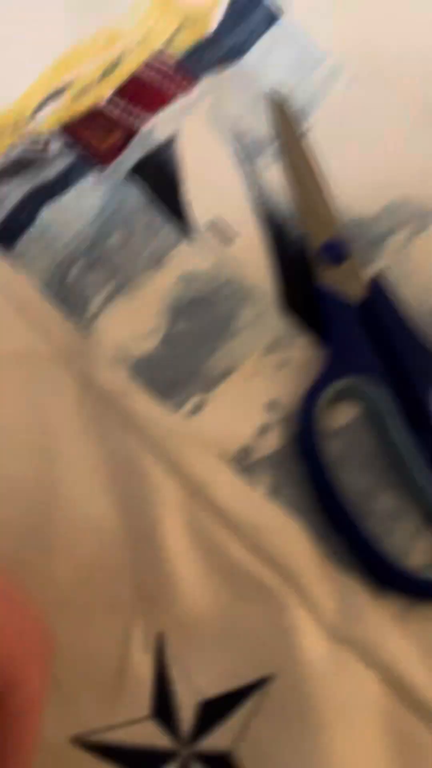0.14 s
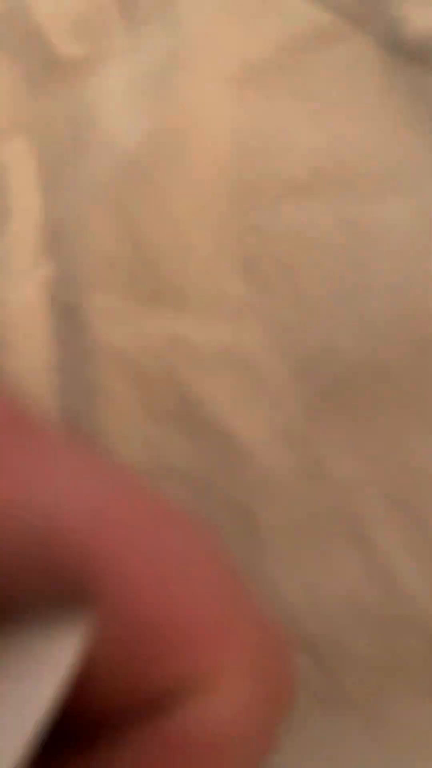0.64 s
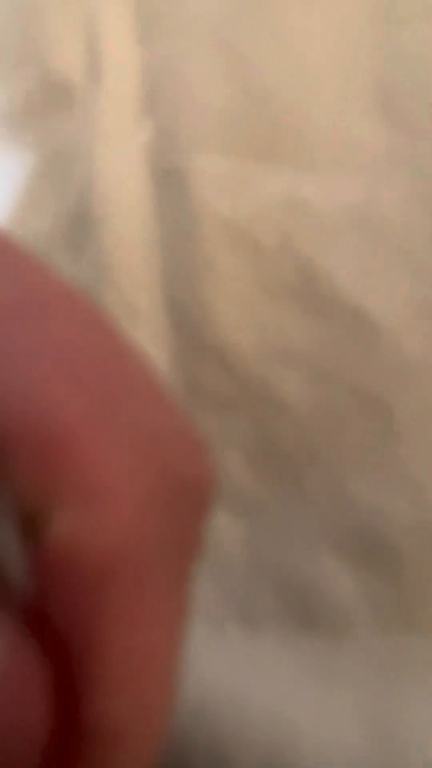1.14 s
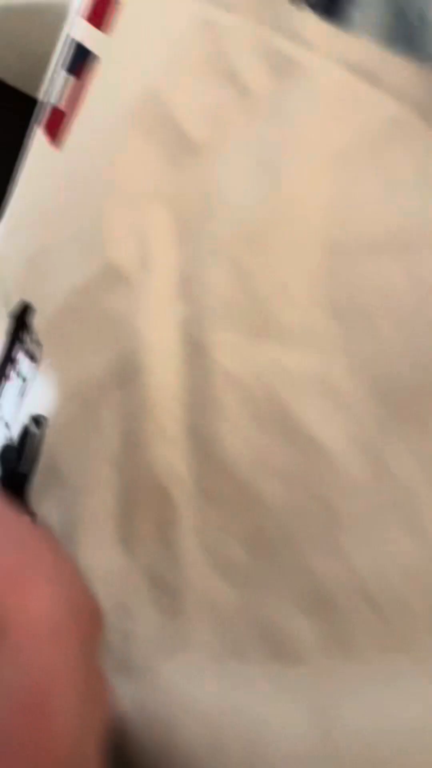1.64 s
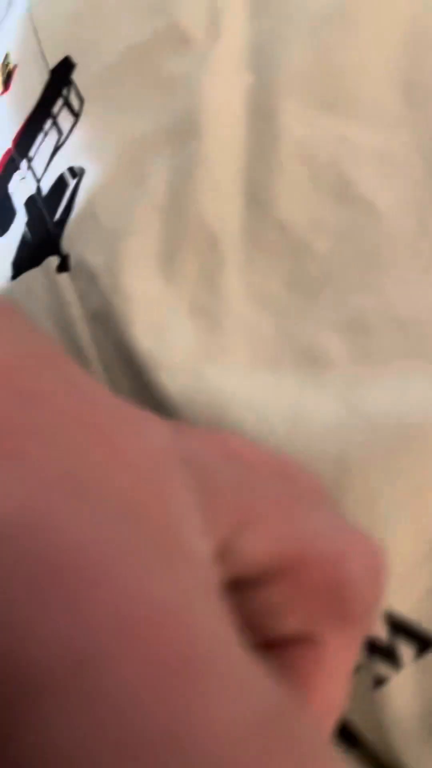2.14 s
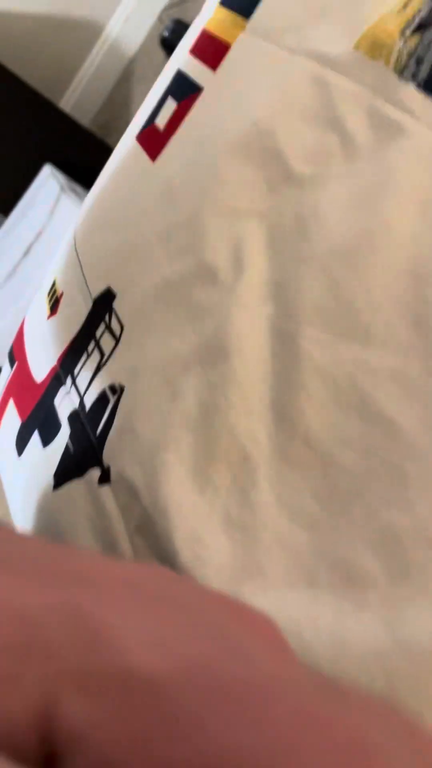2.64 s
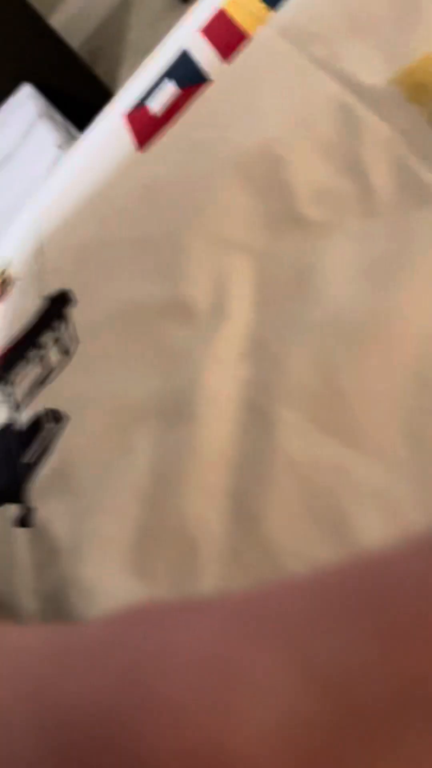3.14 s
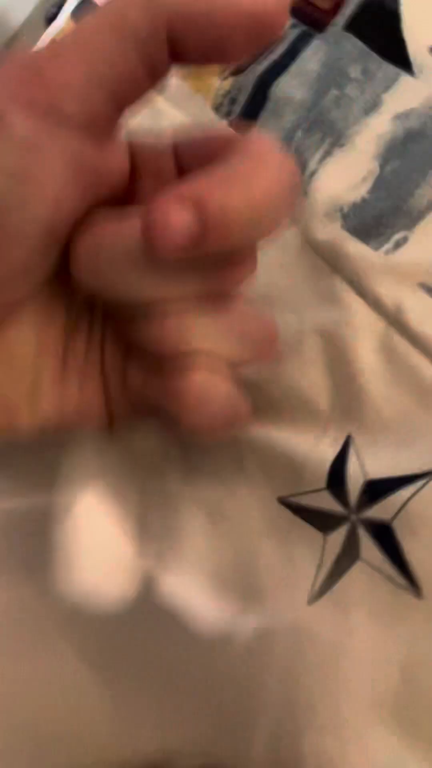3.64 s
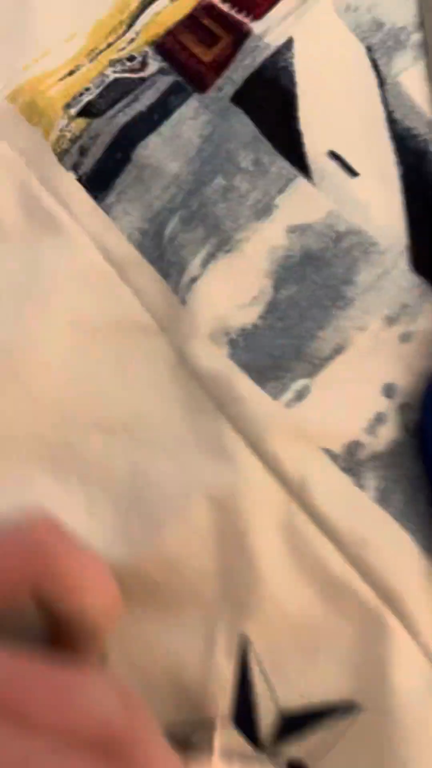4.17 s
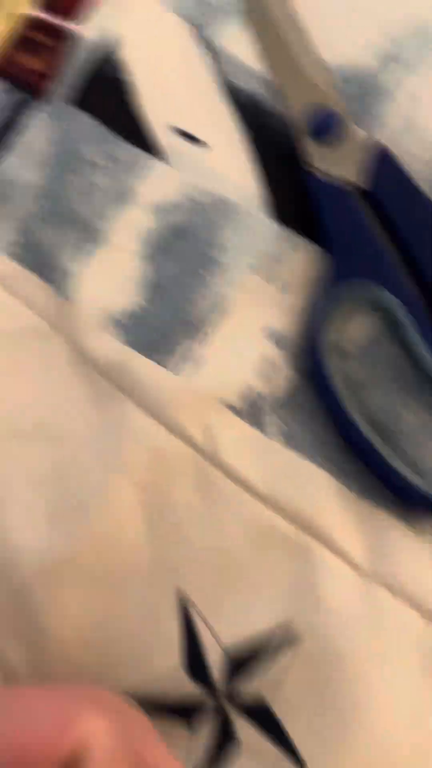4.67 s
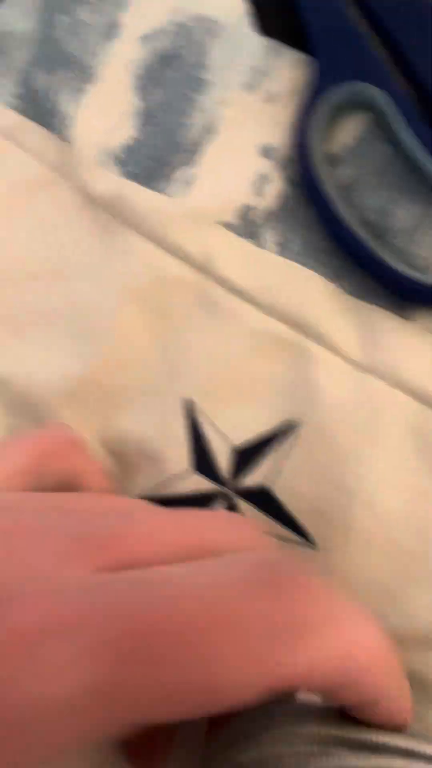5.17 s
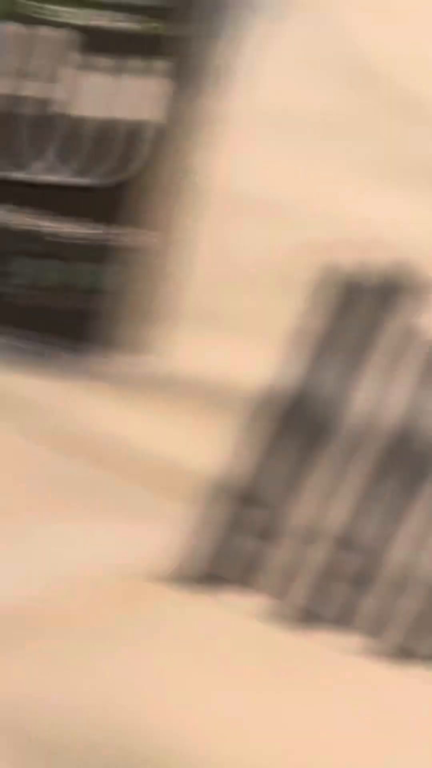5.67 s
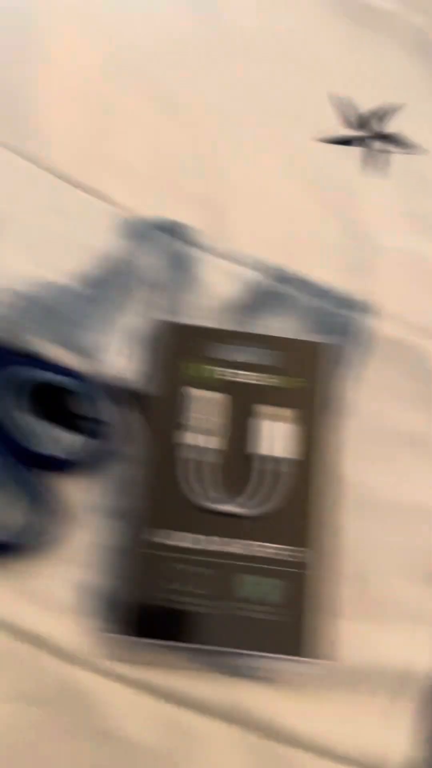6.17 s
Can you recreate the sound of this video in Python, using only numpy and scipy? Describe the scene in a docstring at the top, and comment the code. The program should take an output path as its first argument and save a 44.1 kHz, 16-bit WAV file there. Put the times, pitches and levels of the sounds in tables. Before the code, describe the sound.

Close up, hands pull open a stiff plastic and card package: bright snaps, hollow card pops, crinkling rubs and soft low bumps.

```python
"""On a bed, close to a two-port phone microphone, hands pull a plastic and card package open.
The film cracks and snaps in short bright bursts, the card buckles with short falling pops, and the box bumps.
Between these, fingers rub and crinkle the sheet: shaped noise, gliding resonances and crowds of tiny bursts.
Bending waves carry treble faster than bass, so every struck event sweeps downward."""
import sys
import numpy as np
from scipy import signal
from scipy.fft import rfft, irfft, next_fast_len
from scipy.io import wavfile
from scipy.ndimage import uniform_filter1d

SR = 44100
rng = np.random.default_rng(int(sys.argv[2]) if len(sys.argv) > 2 else 0)


def dump(signal):
    """Clip the signal to [-1, 1] and save it as 16-bit WAV at the path in sys.argv[1]."""
    limited = np.clip(np.atleast_2d(signal).T, -1, 1)
    pcm = np.round(limited * 32767).astype(np.int16)
    wavfile.write(sys.argv[1], SR, pcm)


def gain_from_db(level_db):
    """Convert decibel levels to linear amplitude factors (20 dB per decade)."""
    decades = np.asarray(level_db, float) / 20
    return 10 ** decades


N = 277830  # 6.3 s

# Film cracks. Each row: time in seconds, peak in dB, pitch of the bright patch in Hz,
# lift of the top end over the rest in dB, broad colour beside the bright patch in dB.
CRACKS = [(0.205, -1, 3310, 1.5, 5.5), (0.5484, -39, 2100, 10, -11.5), (0.555, -43, 2050, 9, -9),
          (0.5873, -15.5, 3830, -10, -5), (0.5925, -6, 3500, -6, -9), (0.728, -25, 2123, 2, -4.5),
          (0.8784, -18, 3640, 2, 3), (1.064, -41, 2180, -3, -2), (1.308, -33.5, 1300, -4, -8.5),
          (1.386, -39, 2200, 0, -16), (1.423, -25, 1880, -9, -9), (1.4379, -25.5, 2210, 5, -1),
          (1.462, -39, 2150, 0, -10.5), (1.481, -41, 1000, -3, -3), (1.947, -36.5, 1920, 24.5, -14),
          (2.077, -37, 2370, 0, -17), (2.1504, -10, 2650, -1, -12), (2.156, -16, 2300, 0.5, -1.5),
          (2.1843, -14, 2640, -5, -2), (2.2386, -30.5, 3700, 16.5, -2), (2.2555, -12, 4530, -2, 5.5),
          (2.2611, -3, 2060, 3.5, -1), (2.458, -23.5, 2200, 4, -12.5), (2.64, -36, 2570, -6, -12),
          (2.803, -44.5, 2030, -2, -5), (2.994, -41.5, 4750, 3, -8), (3.023, -21.5, 5320, 5, -9.5),
          (3.1306, -41, 5490, 10, -17), (3.1407, -30.5, 1600, 1.5, 3), (3.1593, -15.5, 4960, 10.5, -20),
          (3.1991, -11, 5470, 16.5, -24), (3.207, -20.5, 5400, 10, -6.5), (3.2172, -6.5, 5400, 11, -12.5),
          (3.225, -8.5, 5500, 9.5, 0), (3.239, -15.5, 5800, 7.5, -1), (3.249, -14, 2800, 4, -1.5),
          (3.259, -4, 5400, 1.5, -8.5), (3.339, -21.5, 2170, 4, -2.5), (3.3543, -5, 2830, 8, -5.5),
          (3.359, -11.5, 4470, 1.5, 0), (3.3964, -8.5, 5120, 11, -8), (3.4037, -12, 3940, 6.5, -4),
          (3.4193, -16.5, 5720, 9.5, -5), (3.461, -30, 5400, 2.5, -9.5), (3.4989, -35.5, 2270, 2, -7),
          (3.5246, -9, 3740, 16, -14), (3.5459, -8.5, 1500, 7.5, 5), (3.5668, -24.5, 1776, -2.5, -2),
          (3.598, -26, 1500, 1.5, -1.5), (3.616, -4, 1770, 0.5, 1.5), (3.6273, -6.5, 1840, -4, -1.5),
          (3.646, -23.5, 1740, -14, -15.5), (3.6986, -25, 2070, -4.5, -7.5), (3.757, -50, 1500, -1.5, -16),
          (3.8165, -33, 2220, 6.5, -12.5), (3.9443, -29.5, 1510, -3, 6), (3.9649, -18, 1540, 4, 4),
          (3.986, -26, 1510, -10, -11.5), (4.0522, -27, 2270, -1, -11), (4.4912, -37, 3670, -2, -17),
          (4.556, -28.5, 2510, -13, -9), (4.8263, -20, 2650, 2.5, -4), (4.86, -28.5, 2226, 4.5, -9),
          (4.912, -33, 1600, 2, -7), (5.068, -43.5, 1560, -12, -8), (5.4514, -28, 1600, 0, -20),
          (5.4605, -21, 2170, 6, -10), (5.6366, -43, 1490, 4, -19), (5.823, -36, 2230, 12, -16.5),
          (5.872, -49.5, 1540, 4, -8.5), (5.9456, -42, 2480, 8.5, 10.5), (6.027, -29, 1490, 10, 0)]
# Single clean snaps of a crease. Each row: the same columns as the film cracks.
SNAPS = [(0.6386, -30.5, 1200, -18, -5.5), (1.1805, -34, 1300, 4.5, -5), (2.206, -28.5, 4500, -0.5, -1),
         (2.32, -29.5, 2500, 1, -0.5), (2.3732, -16.5, 2370, -10, -7), (2.385, -27, 1800, -4.5, -6),
         (2.4147, -10, 5000, -7.5, -4.5), (2.43, -36, 2500, -2, -5.5), (2.8233, -21, 2870, -5.5, -4),
         (2.8436, -20, 1890, 1.5, -9), (3.0413, -7, 2100, 7.5, 2), (4.1323, -10, 2160, -6.5, 2),
         (4.135, -16, 1000, -10.5, -2.5), (4.6265, -24, 1210, -10, -12), (4.801, -26.5, 1650, -21, -12),
         (5.4926, -6, 4500, -1, 4), (5.495, -14.5, 1950, 3.5, 9)]
# Card buckles. Each row: time in seconds, peak in dB, pitch in Hz.
POPS = [(0.009, -33, 530), (0.204, -13.5, 530), (0.444, -29, 347), (0.546, -17, 544), (0.586, -22, 520),
        (0.592, -4, 742), (0.604, -23, 800), (0.613, -22, 700), (0.638, -27, 800), (0.647, -31.5, 300),
        (0.728, -32, 708), (0.879, -24.5, 1254), (0.883, -32, 560), (1.151, -34, 603), (1.16, -29, 711),
        (1.179, -30.5, 503), (1.187, -33.5, 210), (1.284, -36.5, 870), (1.303, -36, 426), (1.341, -36, 450),
        (1.374, -31, 390), (1.382, -31.5, 291), (1.427, -28.5, 217), (1.534, -32.5, 302),
        (1.609, -31.5, 307), (1.722, -31.5, 510), (1.746, -37.5, 330), (1.757, -30.5, 504),
        (1.834, -33.5, 454), (1.9, -35, 438), (1.978, -41, 474), (2.054, -34.5, 1020), (2.151, -13, 555),
        (2.157, -23.5, 385), (2.184, -24, 480), (2.262, -15, 476), (2.264, -17.5, 1000), (2.376, -33, 236),
        (2.414, -21, 634), (2.456, -33, 297), (2.587, -34, 252), (2.641, -35, 580), (2.737, -38, 1100),
        (2.766, -39.5, 800), (2.825, -27, 810), (2.867, -27.5, 796), (2.89, -18, 340), (2.962, -37.5, 1100),
        (2.995, -26.5, 960), (3.006, -32, 800), (3.042, -14.5, 705), (3.05, -22, 650), (3.106, -33, 700),
        (3.158, -25, 870), (3.259, -8.5, 498), (3.333, -22.5, 670), (3.352, -10, 1110), (3.359, -14, 574),
        (3.395, -18.5, 972), (3.543, -16, 890), (3.545, -29, 303), (3.574, -22.5, 670),
        (3.616, -11.5, 1175), (3.63, -11, 399), (3.646, -10.5, 292), (3.697, -27, 1220), (3.702, -21, 298),
        (3.709, -19.5, 230.5), (3.806, -39.5, 450), (3.947, -34, 255), (4.043, -25, 1370),
        (4.133, -16.5, 396), (4.274, -23.5, 500), (4.312, -27.5, 1100), (4.349, -24.5, 744),
        (4.465, -36, 880), (4.587, -21, 600), (4.625, -22.5, 795), (4.801, -23, 472), (4.826, -34.5, 666),
        (4.858, -33, 298), (4.88, -31, 990), (4.91, -38, 700), (5.03, -41, 710), (5.067, -25.5, 1140),
        (5.147, -40, 450), (5.438, -40.5, 620), (5.45, -32, 596), (5.494, -22.5, 573), (5.5, -23.5, 326),
        (5.822, -35, 1040), (6, -51, 1060), (6.025, -37, 1090)]
# Box bumps. Each row: time in seconds, peak in dB, pitch in Hz.
BUMPS = [(0.197, -44, 186), (0.282, -34, 126.3), (0.389, -35.5, 191), (0.597, -31.5, 161.2),
         (0.647, -37.5, 175.7), (1.17, -40, 175), (1.416, -35, 170.5), (2.14, -27.5, 182),
         (2.204, -30.5, 171), (2.226, -31.5, 196.4), (2.271, -39, 150.4), (2.449, -28.5, 171),
         (2.712, -38, 129.8), (2.879, -34, 175.8), (3.247, -28.5, 194.4), (3.354, -20.5, 190.7),
         (3.626, -19.5, 88.1), (3.642, -27, 151), (3.668, -29.5, 70), (3.711, -22, 140.6),
         (3.722, -17, 62.4), (3.748, -25.5, 75.8), (3.805, -32, 57), (3.835, -38.5, 201), (3.96, -29, 71.2),
         (4.049, -36, 144.6), (4.135, -24.5, 119.2), (4.371, -35, 86), (4.599, -30, 160),
         (4.806, -32.5, 61.4), (5.059, -39.5, 141.8), (5.181, -41, 85.9), (5.46, -30.5, 58.6),
         (5.573, -20.5, 84.9), (5.592, -25.5, 99), (5.585, -26, 50.7), (5.624, -29.5, 70.4),
         (6.018, -42.5, 95)]
# Colour of rubbed film. Each row: frequency in Hz, relative level in dB per Hz.
FILM = [(600, -8), (1300, -1), (2300, 1), (3000, -2.5), (3800, -3), (4600, -5), (5400, -4.5), (7500, -5),
        (10200, -13.5), (13000, -20), (15500, -15), (16100, -27.5), (16900, -58.5), (18000, -100)]
# Colour of rustling card. Each row: frequency in Hz, relative level in dB per Hz.
CARD = [(100, -13.5), (250, 1.5), (500, 0), (800, 0), (1300, -5), (2500, -45), (5000, -69)]
# Colour of the low rumble. Each row: frequency in Hz, relative level in dB per Hz.
RUMBLE = [(20, -27), (32, -4), (45, 6), (75, 9.5), (130, 8.5), (250, 1), (450, -56.5)]

REST_RUB_DB = -3.5  # the film under a resting hand, below the card
BUSY_S = 6.2  # the small unlisted sounds are scattered over this span


def read(points, hz):
    """Reads a spectrum on a log-frequency axis."""
    f, value = np.transpose(points)
    return np.interp(np.log(hz + 1), np.log(f + 1), value)


def evened(x):
    """Scales to rms 1."""
    return x / np.sqrt(np.mean(x ** 2) + 1e-20)


def add(mix, s, sound):
    """Mixes a two-row sound in at time s."""
    part = mix[:, round(s * SR):][:, :sound.shape[1]]
    part += sound[:, :part.shape[1]]


def coloured(x, points):
    """Filters by a spectrum and evens the level."""
    size = next_fast_len(N)
    gain = gain_from_db(read(points, np.fft.rfftfreq(size, 1 / SR)))
    return evened(irfft(rfft(x, size) * gain, size)[..., :N])


def mode(hz, centre_hz, width):
    """A causal resonance, width in Hz, falling away below and above its centre."""
    u = hz / centre_hz
    damping = 1j * u * width / centre_hz
    return damping / (1 - u ** 2 + damping)


def struck(db, shape, burst_s, travel, blow, size):
    """One sharp blow in a ragged burst, coloured by shape(hz); each frequency lags by travel / sqrt(hz) s."""
    t = np.arange(size) / SR - 2 * burst_s
    hz = np.fft.rfftfreq(size, 1 / SR) + 1
    ragged = rng.standard_normal((2, size)) * rng.exponential(1, (2, size))
    rise = 1.85 * np.exp(np.minimum(t, 0) / (0.3 * burst_s))
    fall = np.exp(-(np.maximum(t, 0) / (1.47 * burst_s)) ** 2)
    burst = ragged * np.where(t < 0, rise, fall)
    burst /= np.linalg.norm(burst, axis=1, keepdims=True)
    burst[:, round(2 * burst_s * SR)] += blow * rng.choice([-1, 1])
    quarter = np.array([[1], [1j * rng.choice([-1, 1])]])  # the sibling path is a quarter cycle apart
    lag = np.exp(-4j * np.pi * travel * np.sqrt(hz))
    sound = irfft(rfft(burst) * quarter * shape(hz) * lag, size)
    sound = np.roll(sound, round(2 * travel * SR / 150), 1)
    sound = sound * signal.windows.tukey(2 * size, .5)[size:]  # fades out over the second half
    return gain_from_db(db) * sound / abs(sound).max(1, keepdims=True)


def drags(column, rest_db):
    """Gain of one layer: the hold that never rests, plus every drag of the fingers."""
    # The hold between drags. Each row: time in seconds, flexing of the card in dB.
    grip = [(0, -51), (.4, -58.5), (1., -62), (1.6, -55), (2.7, -55), (3.3, -45), (3.66, -56), (3.9, -63),
            (4.1, -52), (5., -54.5), (5.55, -58.5), (5.74, -66), (5.97, -74), (6.3, -82)]
    # Finger drags. Each row: start in seconds, length in seconds, rubbing of the film in dB,
    # flexing of the card in dB.
    finger_drags = [(0.082, 0.096, -46.5, -52.5), (0.211, 0.17, -54, -50.5), (0.435, 0.0077, -43.5, -42.5),
                    (0.474, 0.066, -65, -58), (0.569, 0.099, -66, -42.5), (0.697, .11, -48.5, -51),
                    (0.892, 0.1, -72, -56.5), (1.088, 0.044, -54, -52.5), (1.181, 0.031, -51, -40),
                    (1.273, 0.13, -53, -46.5), (1.411, 0.068, -51, -45.5), (1.507, 0.052, -55, -57),
                    (1.646, 0.44, -50, -51.5), (2.142, 0.065, -40.5, -40), (2.23, 0.092, -46.5, -49.5),
                    (2.333, 0.08, -51, -51.5), (2.449, 0.063, -47, -43), (2.571, 0.067, -49, -49.5),
                    (2.752, 0.21, -55, -51.5), (3.018, 0.055, -43.5, -36), (3.137, 0.064, -38.5, -41.5),
                    (3.194, 0.079, -28.5, -29.5), (3.227, 0.014, -34, -32), (3.266, 0.032, -37.5, -36),
                    (3.29, .03, -40, -41.5), (3.329, 0.038, -35.5, -35), (3.384, 0.079, -40.5, -42),
                    (3.48, 0.093, -44.5, -44.5), (3.568, 0.07, -35.5, -31.5), (3.808, 0.016, -52, -52.5),
                    (3.951, 0.056, -45.5, -47), (4.025, 0.079, -49, -45.5), (4.168, .08, -53, -54.5),
                    (4.255, 0.14, -48, -41.5), (4.456, 0.13, -53, -54), (4.624, 0.059, -46, -43),
                    (4.689, .1, -60, -56), (4.801, 0.13, -56, -45.5), (5.029, 0.19, -51.5, -46),
                    (5.301, 0.12, -49, -50.5), (5.426, 0.048, -45, -39.5), (5.498, 0.031, -62.5, -45),
                    (5.533, 0.077, -56, -61.5), (5.767, 0.025, -46, -59), (5.82, 0.085, -69.5, -62.5),
                    (6.003, 0.053, -61, -63)]
    edge_s = 0.014  # a drag starts and stops this softly
    t = np.arange(N) / SR
    power = gain_from_db(np.interp(t, *np.transpose(grip)) + rest_db) ** 2
    for row in finger_drags:
        part = slice(round(row[0] * SR), round((row[0] + row[1]) * SR))
        power[part] += gain_from_db(row[column]) ** 2
    edge = np.hanning(round(2 * edge_s * SR))
    padded = np.pad(power, len(edge), "edge")
    smooth = signal.oaconvolve(padded, edge / edge.sum(), "same")[len(edge):-len(edge)]
    return np.sqrt(abs(smooth))


def aftermath(events, db, fade_s, way=1):
    """Gain that jumps at every event in step with its peak and fades away; way -1 grows towards it."""
    kicks = np.zeros(N)
    at = [round(row[0] * SR) for row in events]
    np.add.at(kicks, at, [gain_from_db(row[1] + db) ** 2 for row in events])
    power = signal.lfilter([1], [1, -np.exp(-2 / (fade_s * SR))], kicks[::way])[::way]
    return np.sqrt(power)


def rubbing(points, per_s, spread_db, grain_share, patchy_db, patch_bins):
    """Soft friction with small slips; bright and dull patches drift as the grip shifts."""
    slip_sizes = gain_from_db(spread_db * np.minimum(rng.exponential(1, N), 3))
    slips = slip_sizes * (rng.random(N) < per_s / SR)
    slips = signal.oaconvolve(slips, np.hanning(130), "same")  # each slip lasts about 3 ms
    power = 1 - grain_share + grain_share * evened(slips) ** 2
    drive = rng.standard_normal((2, N)) * np.sqrt(power)
    z = signal.stft(drive, nperseg=512, noverlap=384)[2]
    patches = rng.standard_normal(z.shape[1:])
    for _ in range(2):
        patches = uniform_filter1d(uniform_filter1d(patches, patch_bins, 0), 10, 1)
    patchy = signal.istft(z * gain_from_db(patchy_db * evened(patches)), nperseg=512, noverlap=384)[1]
    return coloured(patchy[:, :N], points)


def low_rumble():
    """Low friction noise that loosely follows the flexing; the bedding shakes on after each bump."""
    under_flex_db, follows, flex_mid_db = -11, 0.47, -48  # follows: power of the flexing gain
    flex = drags(column=3, rest_db=-2.5)
    under = gain_from_db(flex_mid_db + under_flex_db) * (flex / gain_from_db(flex_mid_db)) ** follows
    shaking = aftermath(BUMPS, db=-17, fade_s=0.054)
    noise = rubbing(RUMBLE, per_s=40.0, spread_db=2.0, grain_share=0.2, patchy_db=2.5, patch_bins=1)
    return np.hypot(under, shaking) * noise


def card_rustle():
    """Card friction noise follows the flexing and swells as the card settles after each buckle."""
    flex = drags(column=3, rest_db=-2.5)
    settling = aftermath(POPS, db=-15, fade_s=0.013)
    noise = rubbing(CARD, per_s=150.0, spread_db=3.0, grain_share=0.45, patchy_db=4.5, patch_bins=2)
    return np.hypot(flex, settling) * noise


def film_hiss():
    """Film friction noise follows the rubbing, strains before each crack and hisses on after it."""
    hard_rub_db = -21.5  # at this level the film rings bright as much as it hisses
    sheen_hz, sheen_width_hz = 5400, 290
    rub = drags(column=2, rest_db=REST_RUB_DB)
    hissing_on = aftermath([*CRACKS, *SNAPS], db=-41, fade_s=0.057)
    straining = aftermath(CRACKS, db=-33, fade_s=0.0079, way=-1)
    hiss = rubbing(FILM, per_s=300.0, spread_db=3.5, grain_share=0.4, patchy_db=3.5, patch_bins=3)
    sheen = evened(signal.lfilter(*signal.iirpeak(sheen_hz, sheen_hz / sheen_width_hz, SR), hiss))
    sheen_share = np.minimum(rub / gain_from_db(hard_rub_db), 1.5)
    return np.hypot(rub, hissing_on + straining) * (hiss + sheen * sheen_share)


def bumps(mix):
    """The box thuds against hand and bedding in slow falling swings; deeper bumps push for longer."""
    for s, db, hz0 in BUMPS:
        burst_s = 0.016 * (100 / hz0) ** 0.453

        def shape(hz):
            return mode(hz, hz0, 0.749 * hz0) ** 2 + 0.26 * gain_from_db(read(RUMBLE, hz))

        add(mix, s - 2 * burst_s - .008, struck(db, shape, burst_s, travel=.18, blow=1.3, size=8192))


def crinkles(mix):
    """Many small unlisted buckles, as strong as the card is being flexed, up to a ceiling."""
    ceiling_db = -47  # harder flexing makes crinkles no stronger
    flex = np.minimum(drags(column=3, rest_db=-6), gain_from_db(ceiling_db))
    for at, pitch, strength in rng.random((240, 3)):
        hz0 = 250 * 6. ** pitch

        def shape(hz):
            return mode(hz, hz0, 0.5 * hz0) ** 2

        over_flex_db = 1.0 + 12.5 * strength ** 2
        crinkle = struck(over_flex_db, shape, burst_s=0.0012, travel=.1, blow=1.2, size=1024)
        add(mix, at * BUSY_S, flex[round(at * BUSY_S * SR)] * crinkle)


def ticks(mix):
    """Many tiny unlisted fractures of the film, as strong as it is being rubbed."""
    rub = drags(column=2, rest_db=REST_RUB_DB)
    for at, pitch, strength in rng.random((500, 3)):
        hz0 = 1200 * 5.5 ** pitch

        def shape(hz):
            return gain_from_db(read(FILM, hz)) * (2.0 + mode(hz, hz0, 0.83 * hz0))

        over_rub_db = 4.5 + 6 * strength ** 2
        tick = struck(over_rub_db, shape, burst_s=0.00048, travel=.04, blow=1.0, size=512)
        add(mix, at * BUSY_S, rub[round(at * BUSY_S * SR)] * tick)


def gliding_friction(mix, rows, width):
    """Friction noise in a resonance that glides as the contact slides; width is a share of the start pitch."""
    for s, length, db, start_hz, end_hz in rows:
        size = round(length * SR)
        turn = np.exp(2j * np.pi * np.cumsum(np.linspace(start_hz, end_hz, size)) / SR)
        noise = rng.standard_normal((2, size)) + 1j * rng.standard_normal((2, size))
        r = np.exp(-np.pi * width * start_hz / SR)
        slow = signal.lfilter([1], np.poly([r, r]), noise)
        steady = slow / np.sqrt(abs(slow) + 1e-9)  # continuous contact evens out the swells
        glide = evened((turn * steady).real)
        add(mix, s, gain_from_db(db) * glide * signal.windows.tukey(size, .6))


def sheet_strokes(mix):
    """Skin or nail strokes the sheet: friction noise in a broad gliding resonance."""
    # Each row: start in seconds, length in seconds, level before the edge fades in dB,
    # start pitch in Hz, end pitch in Hz.
    stroke_rows = [(0.461, 0.041, -57, 2300, 1976), (4.255, 0.17, -50.5, 2210, 2240),
                   (3.955, 0.065, -41, 1377, 1540), (4.047, 0.019, -38, 2353, 2360),
                   (3.132, .065, -37.5, 804, 1000), (3.218, .035, -32, 350, 900),
                   (3.333, 0.018, -29.5, 620, 610), (3.37, 0.022, -37, 900, 1100),
                   (4.613, 0.087, -45.5, 1260, 1005), (4.721, 0.065, -61, 1596, 1660),
                   (5.285, 0.22, -50.5, 1334, 1240), (5.383, 0.1, -46.5, 2187, 2700),
                   (5.758, 0.031, -46, 4410, 3253), (5.761, 0.041, -47.5, 1020, 1058),
                   (5.754, 0.031, -47.5, 5960, 5860), (5.756, 0.051, -49.5, 1720, 1630)]
    gliding_friction(mix, stroke_rows, width=.13)


def fingertip_squeaks(mix):
    """A fingertip squeaks thinly: friction noise in a narrow gliding resonance."""
    # Each row: start in seconds, length in seconds, level before the edge fades in dB,
    # start pitch in Hz, end pitch in Hz.
    squeak_rows = [(0.552, .03, -38, 430, 390), (1.965, 0.067, -51, 478, 521), (4.195, .03, -45, 623, 689),
                   (4.308, 0.031, -37.5, 645, 720), (4.329, 0.046, -31, 581.5, 831),
                   (4.372, 0.02, -39, 599, 632), (5.503, 0.064, -43, 1608, 1019),
                   (5.929, 0.026, -57, 982, 1007)]
    gliding_friction(mix, squeak_rows, width=.04)


def pops(mix):
    """A buckle rings a few cycles at its pitch, with a faint longer ring, over the broad colour of the card."""
    ring_s, burst_s, travel = 0.031, 0.001755, .1  # a longer ring_s narrows both resonances
    for s, db, hz0 in POPS:
        def shape(hz):
            ring = mode(hz, hz0, 2.0 / ring_s + 0.1 * hz0)
            long_ring = .5 * mode(hz, 0.65 * hz0, 1.0 / ring_s)
            body = mode(hz, hz0, 1.35 * hz0) / (1 + 1j * hz / (3 * hz0))
            return (ring + long_ring) * body + 0.22 * gain_from_db(read(CARD, hz))

        start = max(s - 2 * burst_s - .5 * travel / np.sqrt(hz0), 0)
        add(mix, start, struck(db, shape, burst_s, travel, blow=2.5, size=4096))


def fractures(mix, rows, burst_s, blow, width):
    """Film breaks in a burst of broad film colour with one bright patch, its width a share of its pitch."""
    for s, db, hz0, top_db, broad_db in rows:
        def shape(hz):
            top = gain_from_db(top_db * np.clip(np.log2(hz / 5000), 0, 1))  # in full from 10 kHz
            return gain_from_db(read(FILM, hz)) * top * (gain_from_db(broad_db) + mode(hz, hz0, width * hz0))

        sound = struck(db, shape, burst_s, travel=0.03993, blow=blow, size=2048)
        add(mix, s - 2 * burst_s - .0006, sound)


def snaps(mix):
    """A crease snaps clean: one short blow with a wider bright patch."""
    fractures(mix, SNAPS, burst_s=.0008, blow=1.8, width=.3)


def cracks(mix):
    """The film cracks in tiny fractures: a longer, more ragged burst with a narrow bright patch."""
    fractures(mix, CRACKS, burst_s=.0025, blow=0.67, width=.1)


def scene():
    """Two rows: the sound on the path to the left port, and a sibling on other paths."""
    mix = low_rumble() + card_rustle() + film_hiss()
    bumps(mix)
    crinkles(mix)
    ticks(mix)
    sheet_strokes(mix)
    fingertip_squeaks(mix)
    pops(mix)
    snaps(mix)
    cracks(mix)
    return mix


def roll_off(x):
    """The treble ends steeply here."""
    return signal.sosfilt(signal.butter(12, 17300, fs=SR, output="sos"), x)


def record(dry):
    """The right port hears the shared path with a phase turn plus some of the other paths."""
    # Phase between the ports. Each row: frequency in Hz, lead of the left in radians.
    left_lead = [(700, 0), (950, -.5), (2240, .3), (2760, 1.3), (4220, .9), (4910, -.3), (5600, .5),
                 (7000, 2.95), (8200, 3.3), (8900, 3.8), (9800, 5.7), (10600, 6.2), (11600, 6.35),
                 (12400, 7.6), (13300, 9.15), (14700, 9.55), (15600, 10.4), (16400, 10.8)]
    # Likeness of the ports. Each row: frequency in Hz, share of the shared path from 0 to 1.
    likeness = [(60, .995), (200, .88), (600, .6), (1800, .85), (3200, .78), (4000, .88), (4600, .5),
                (5500, .93), (7000, .995), (8200, .995), (9500, .9), (11000, .995), (12700, .85),
                (14000, .995), (16000, .85)]
    # Level between the ports above 100 Hz. Each row: frequency in Hz, left over right in dB.
    port_tilt = [(150, 1.5), (400, 1.2), (950, 0.089), (2400, 0.63), (6000, 0.31), (15000, 0.77)]
    # The package drifts across the ports. Each row: time in seconds, left over right in dB.
    drift = [(0.3, 0), (0.45, -1.5), (1.02, -5), (1.75, -1.5), (2.03, -3), (3.018, -2), (3.51, -0.5),
             (4.53, -1), (6.2, -2)]
    size = next_fast_len(N + 2048)
    hz = np.fft.rfftfreq(size, 1 / SR)
    shared, other = rfft(dry, size)
    same = np.clip(read(likeness, hz), 0, 1)
    # each port takes half of the phase and level differences
    turn = np.exp(.5j * read(left_lead, hz))
    tilt = gain_from_db(.5 * read(port_tilt, hz) * (hz > 100))
    left = shared * turn * tilt
    right = (same * shared + np.sqrt(1 - same ** 2) * other) / turn / tilt
    ports = irfft(np.array([left, right]), size)[:, :N]
    place_db = np.interp(np.arange(N) / SR, *np.transpose(drift))
    band = signal.butter(2, [200, 5000], "band", fs=SR, output="sos")
    middle = signal.sosfiltfilt(band, ports)  # only this band shifts sides
    ports = ports + middle * (gain_from_db(np.outer([.5, -.5], place_db)) - 1)
    return roll_off(ports)


dry = scene()
out = record(dry)
dump(out)
```